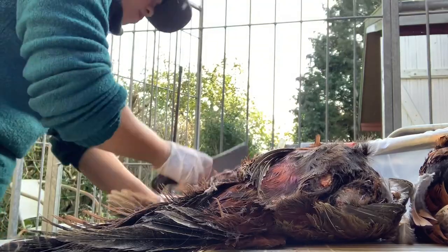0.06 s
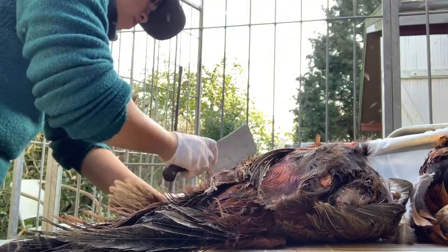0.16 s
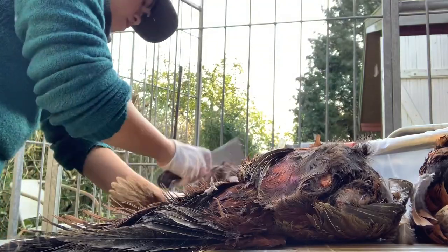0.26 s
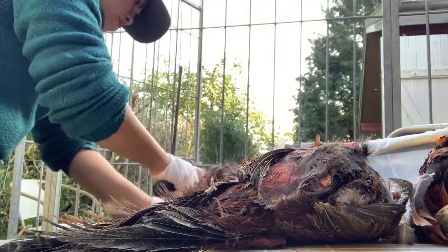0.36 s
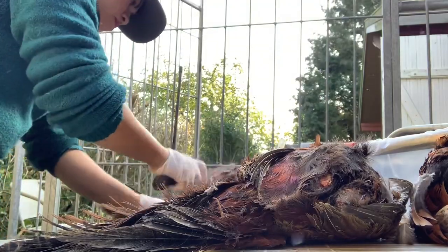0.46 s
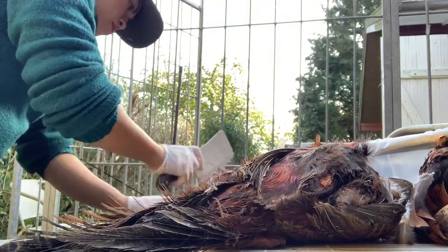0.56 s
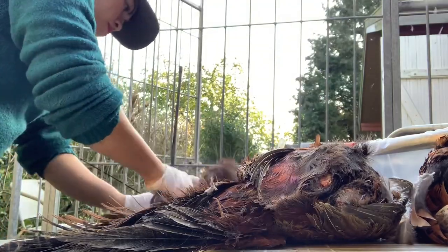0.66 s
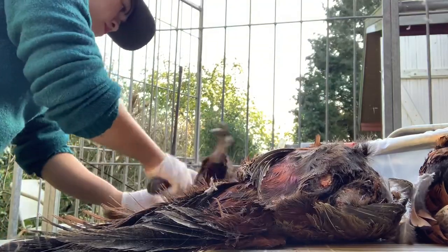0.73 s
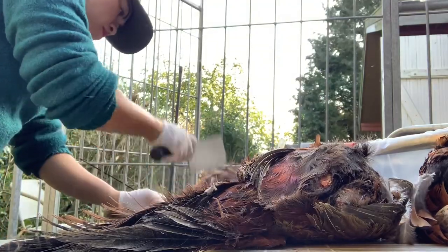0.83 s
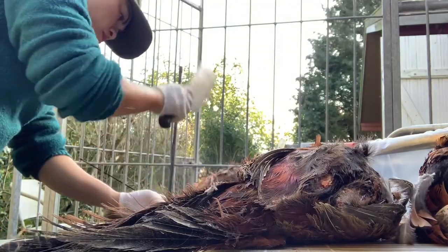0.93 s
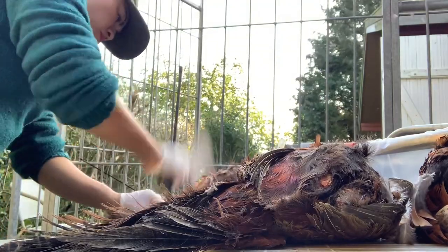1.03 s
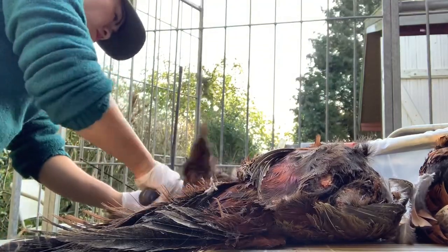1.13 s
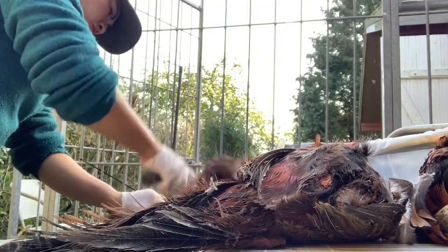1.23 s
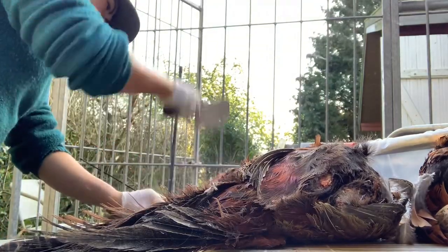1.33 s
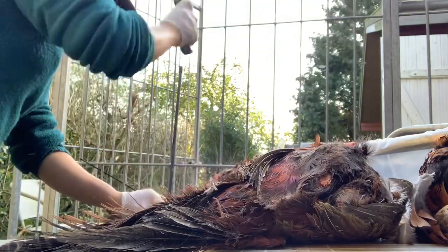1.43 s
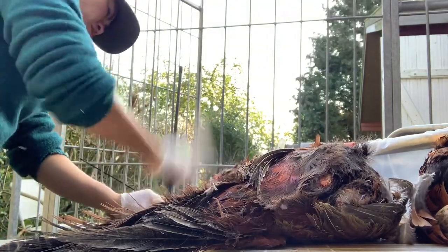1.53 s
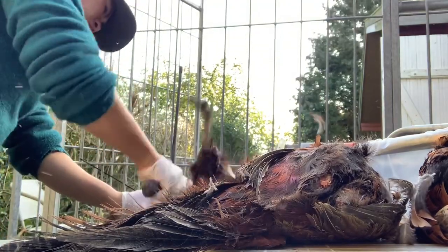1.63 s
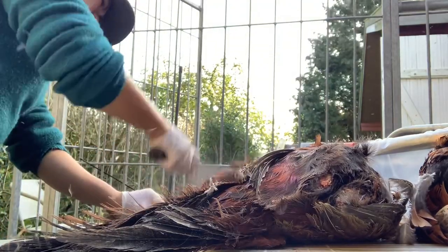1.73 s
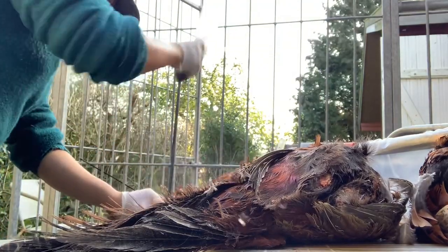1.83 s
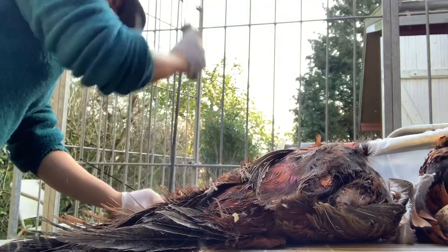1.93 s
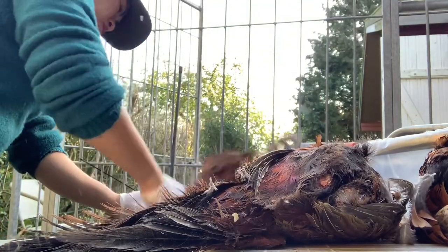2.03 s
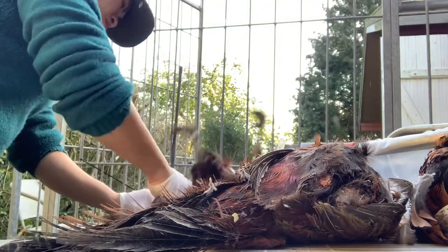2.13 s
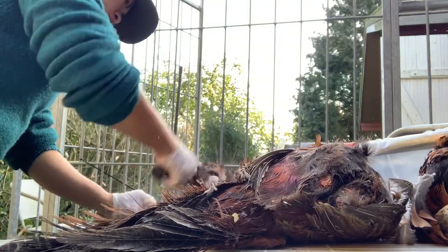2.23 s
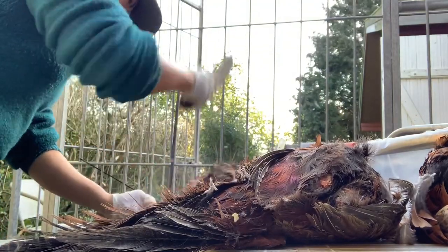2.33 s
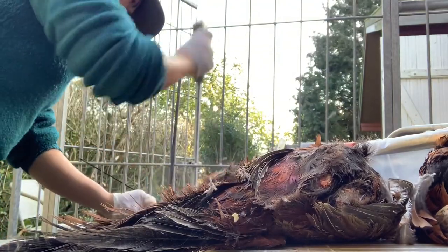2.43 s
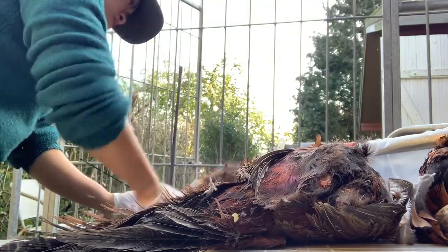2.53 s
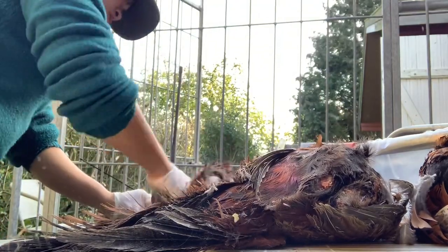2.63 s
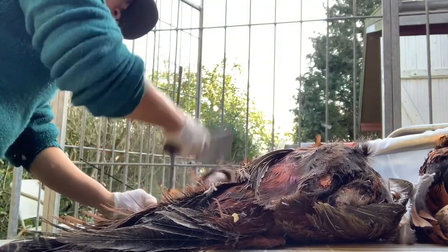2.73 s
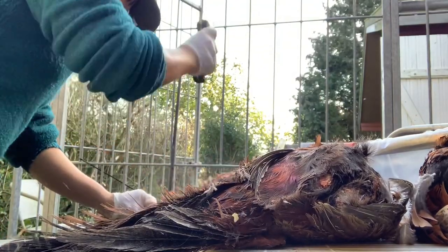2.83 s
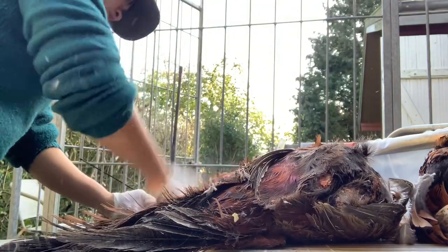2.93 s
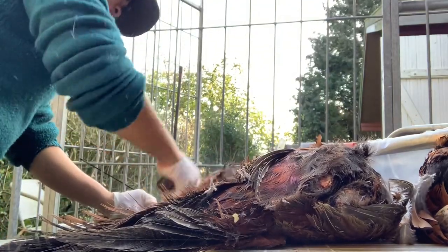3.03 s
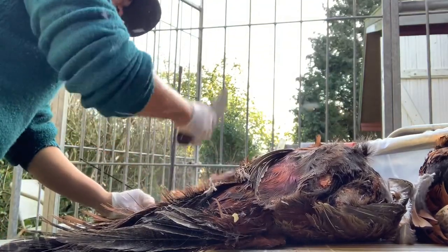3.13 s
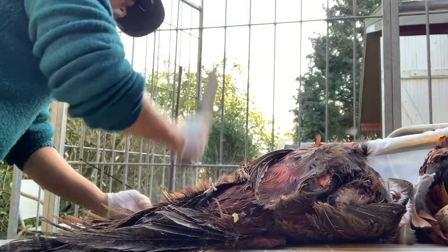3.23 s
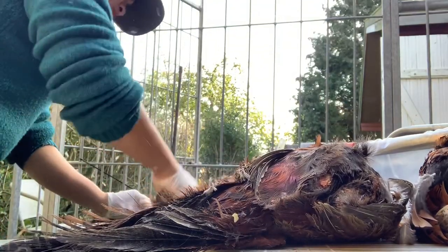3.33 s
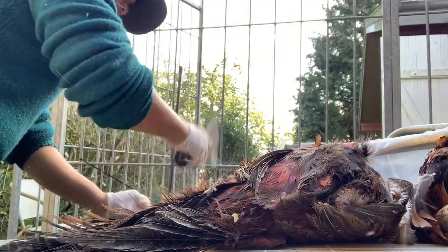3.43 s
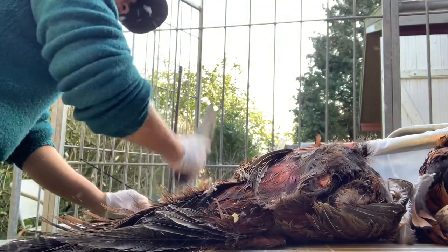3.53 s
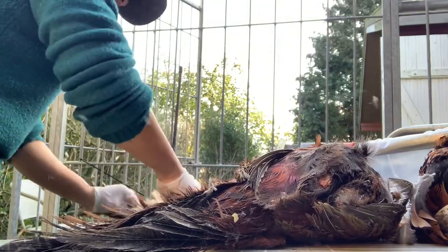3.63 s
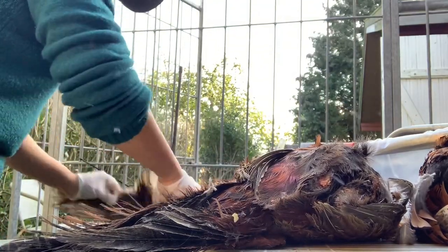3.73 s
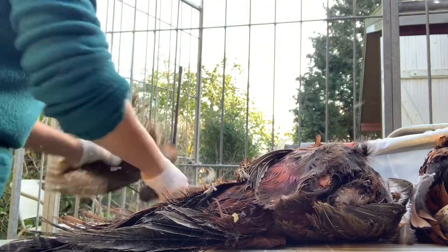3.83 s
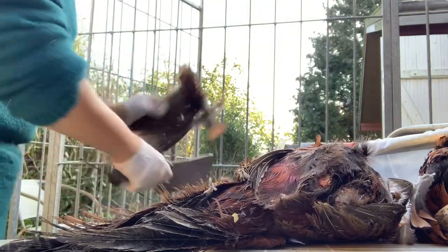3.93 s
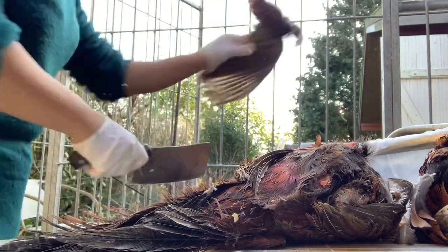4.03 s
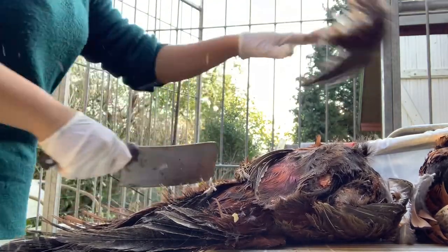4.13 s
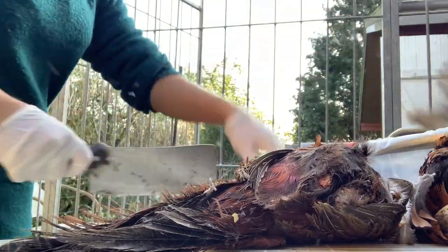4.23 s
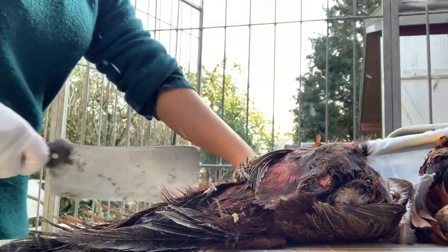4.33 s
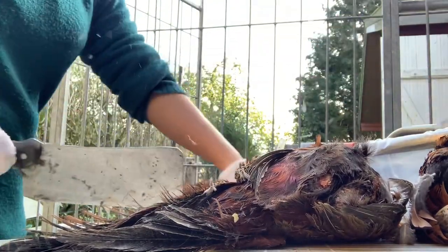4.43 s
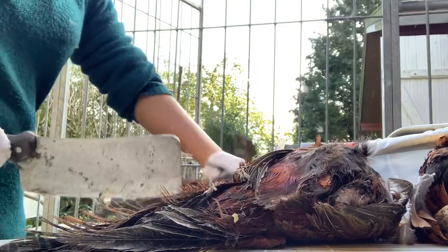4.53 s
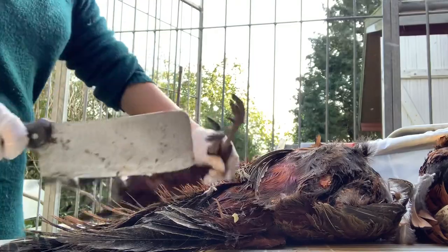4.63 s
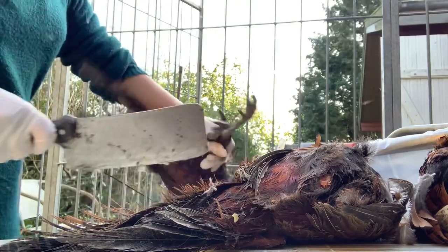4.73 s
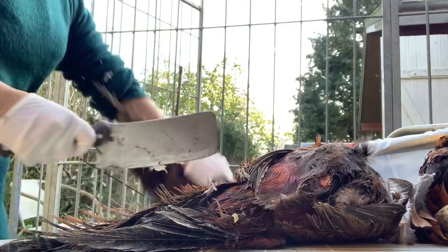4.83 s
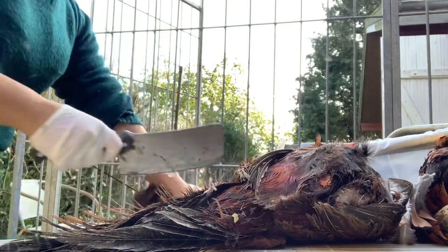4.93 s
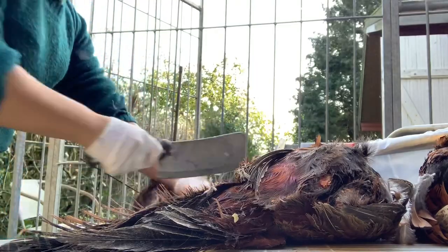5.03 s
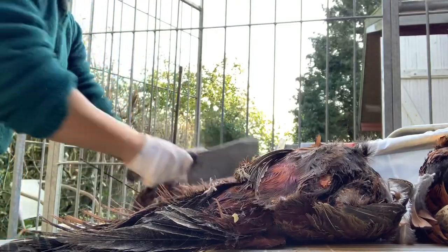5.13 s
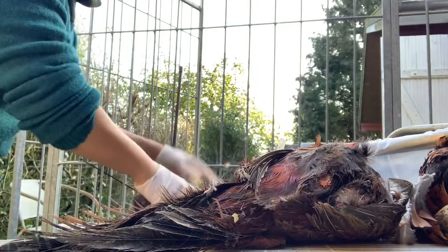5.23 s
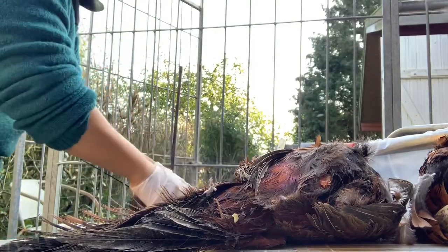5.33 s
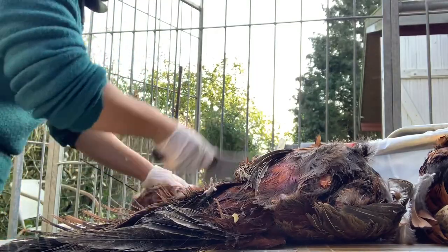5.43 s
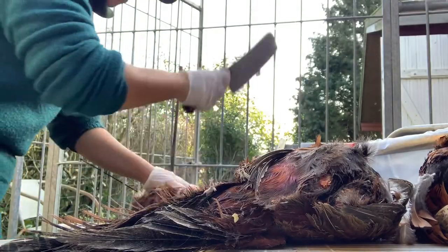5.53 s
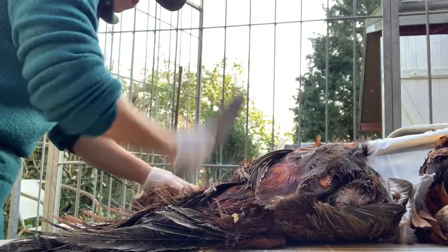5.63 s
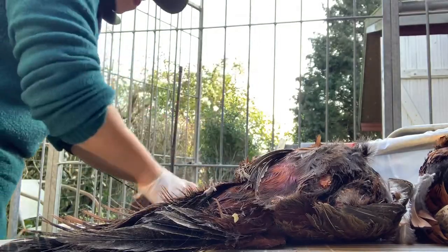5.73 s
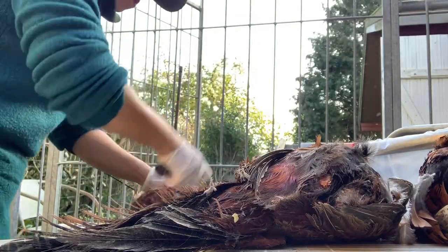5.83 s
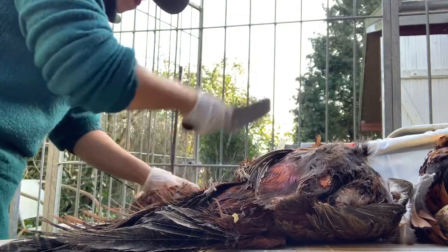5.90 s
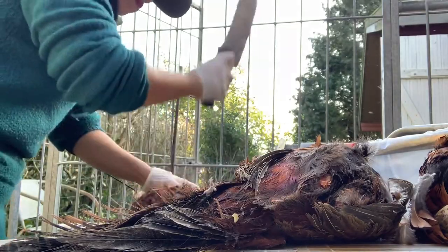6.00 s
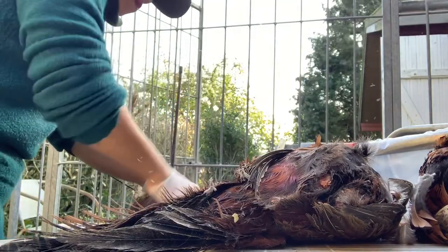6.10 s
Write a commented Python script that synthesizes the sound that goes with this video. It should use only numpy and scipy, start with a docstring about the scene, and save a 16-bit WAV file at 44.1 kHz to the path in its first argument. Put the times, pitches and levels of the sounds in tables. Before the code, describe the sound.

Close, dry stereo in a garden: light fumbling on a table, then about nine uneven chops, first dull and fleshy, later loud, crunchy and cracking, each thudding through the table top. A short squeak slips in among them. The blows stop while pieces are shifted and a tossed wing crackles past, then two crisp bone-breaking blows finish over quiet air and distant traffic rumble.

```python
"""First heard is a far traffic rumble under the murmur of air and leaves, with pieces rustling on a table.
A cleaver then chops feathered carcasses: random snaps of bone, flesh, quill and feather excite resonances.
Each blow also jolts the light table top, whose damped modes knock and then boom, as they do for bumps of
hands and pieces and for bounces just after some blows. A tossed wing brushes past as crackle; squeak, whine
and bird call are wavering tones. Two close microphone ports differ in phase and level."""
import sys
import numpy as np
from scipy import signal
from scipy.fft import rfft, irfft, next_fast_len
from scipy.io import wavfile

SR = 44100
rng = np.random.default_rng(int(sys.argv[2]) if len(sys.argv) > 2 else 0)


def put_to_file(sound):
    """Save the sound as 16-bit audio at rate SR, in the file named by the first command-line argument."""
    columns = np.atleast_2d(sound).T  # one column per channel
    safe = np.clip(columns, -1, 1)
    whole_steps = np.round(safe * 32767)
    wavfile.write(sys.argv[1], SR, whole_steps.astype(np.int16))


N = 271656

# Noise spectrum of far traffic: frequency_hz, density_db (relative, per Hz)
RUMBLE = [(22, -19), (50, 0.5), (100, -6), (200, -14), (330, -14.5)]
RUMBLE_DB = -50.5
# Noise spectrum of air and leaves: frequency_hz, density_db (relative, per Hz)
LEAVES = [(330, -2), (1000, -0.5), (1600, -8.5), (2500, -15), (5000, -23), (6500, -29), (8000, -48),
          (10000, -41.5), (13000, -37.5), (15500, -40)]
# Course of the air and leaves: start_s, level_db
MURMUR = [(0, -58.5), (.9, -53.5), (2.6, -59), (3.9, -57), (6.16, -58.5)]
# Left-right correlation of the background: frequency_hz, likeness (-1 to 1)
LIKENESS = [(60, 0.79), (150, 0.91), (380, 0.36), (950, -0.38), (2380, -0.11), (5980, 0.25), (15000, 0.1)]

# Tone curves: start_s, pitch_hz, level_db (before the common tone gain and flutter)
SQUEAK = [(3.27, 1615, -72), (3.35, 1625, -67), (3.43, 1612, -77)]   # short squeak
WHINE = [(5.3, 1141, -74.5), (6.16, 1132, -67.5)]   # faint far whine
WAVER = [(.6, 1110, -75), (.72, 1080, -65), (.9, 1093, -66.5)]   # faint wavering tone
CHIRP = [(1.35, 7060, -81), (1.44, 7500, -72), (1.47, 7700, -80)]   # thin bird call
# Partials of the squeak: multiple, level_db
SQUEAK_OVERTONES = [(1, 0), (2, -12), (3, -18)]

# A tossed wing brushes past: start_s, level_db, hiss_db (re level)
FEATHERS = [(4.17, -72, 0), (4.196, -50.5, -3.5), (4.3, -62.5, -13), (4.39, -63.5, -13), (4.45, -45, -9),
            (4.51, -64, -18), (4.596, -66, -4), (4.64, -71.5, -17), (4.79, -87, -16)]
# Resonances of feather hiss: frequency_hz, width_hz, level_db
FEATHER = [(7300, 3300, -4.5), (11770, 1870, 1.5), (13500, 2300, 0), (15700, 1370, 2)]
HISS_SLOPE = 1.64   # dB of hiss gained per dB of quill crackle in a contact

# Knock modes of the table top, before random spread: frequency_hz, level_db, t60_s
KNOCK_MODES = [(162.4, 0, 0.06), (205, 2.5, 0.058), (256, -4.5, 0.065), (332, -11.5, 0.039)]
# Boom modes of the whole top on its legs: multiple (of BOOM_HZ), level_db, t60_s
BOOM_MODES = [(1.0, 0, 0.041), (1.04, -6.5, 0.2), (.8, -10, 0.15), (1.38, 0, 0.071), (1.75, -2, 0.061)]
BOOM_HZ, BOOM_LAG_S = 92.7, 0.00672
# Bumps of hands and pieces, and bounces just after some blows: start_s, jolt_db
BUMPS = [(0.487, -29), (0.523, -34), (0.605, -39), (0.626, -35), (0.776, -44), (.855, -37.5), (1.031, -20),
         (1.193, -34), (1.297, -31.5), (1.689, -34), (1.842, -18), (1.991, -16.5), (2.91, -27.5),
         (3.807, -34.5), (4.445, -33.5), (5.145, -44)]
BUMP_BOOM_DB = -4.5   # boom re jolt

# Cleaver blows: start_s, level_db, cutting_ms, bone_ring_hz, flesh_db, splinter_db, quill_db,
# crack_ms (after the bite), jolt_db (into the table), boom_db (re jolt)
CHOPS = [(1.002, -39, 24, 1266, 6, -12, -22, 15, -21, -1),
         (1.498, -30.5, 18, 1405, 3.5, -6, -12, 10.8, -14.5, -2),
         (1.540, -34.5, 15, 1030, 2.5, -26.5, -19, 8, -20.5, -5.5),
         (1.962, -25, 14, 1594, 6, -9.5, -11, 8.1, -10, -4),
         (2.201, -32.5, 12, 1680, -5.5, -11, -10.5, 6.4, -38, 4),
         (2.476, -20, 17, 1534, -6, -14.5, -11.5, 12.4, -13, -3),
         (2.886, -18.5, 23, 1475, -4.5, -12, -18, 17.7, -13.5, -2),
         (3.241, -22.5, 13, 1420, -3.5, -14, -18.5, 7.5, -13.5, -2.5),
         (3.522, -20.5, 21, 1495, -6, -19, -24.5, 12.8, -20, 2.5),
         (5.626, -19.5, 17, 1756, -4.5, -11, -6.5, 14.3, -20.5, 0.5),
         (6.027, -22, 18.6, 1750, -5, -6, -8.5, 15, -22, 9)]
JOLT_SHARE = 0.748   # share of the cut after which the blow reaches the table
# Pieces dragged, gripped and dropped: start_s, level_db, contact_ms, bone_ring_hz, flesh_db, splinter_db
RUSTLES = [(0.015, -56.5, 22, 1440, 3.5, -9.5), (0.61, -55.5, 16, 1580, -1, -17),
           (0.70, -57, 9.8, 1510, -2, -14.5), (0.788, -63, 21, 3800, 2, -2.5),
           (1.04, -61, 20, 1420, 13, -1.5), (1.19, -60, 52, 1300, -4, -10.5),
           (2.005, -62.5, 31, 1410, -7, 4.5), (2.16, -53.5, 33, 1730, -14, -12.5),
           (3.803, -59.5, 38, 860, 18.5, -29), (3.85, -66.5, 74, 790, 15, -16.5),
           (4.192, -55, 12, 1380, 11, -6), (4.43, -51, 38, 1420, 6, -7),
           (4.962, -44.5, 37, 1540, -8, -19.5), (4.988, -47.5, 23, 2580, -5, -7),
           (5.135, -53.5, 21, 1440, 5.5, -5)]
RUSTLE_PEAK_SHARE = 0.65   # share of the contact at which its crack comes
# Bone resonances: multiple (of bone ring), width_hz, level_db
BONE = [(1.0, 237, 3.5), (.86, 220, 0), (.68, 224, 0), (1.2, 630, -9.5)]
# Soft tissue resonances: frequency_hz, width_hz, level_db
FLESH = [(304, 227, 2), (530, 423, 3.5), (787, 309, 1)]
# Splinter resonance: frequency_hz, width_hz, level_db
SPLINTER = [(2400, 2460, 0)]
# Quill resonance: frequency_hz, width_hz, level_db
QUILL = [(4990, 2850, 0)]
# Blade modes damped by the meat, before random spread: frequency_hz, width_hz, level_db
BLADE = [(2068, 130, 7.5), (2345, 200, 8.5), (3460, 270, -2.5), (4350, 96, -10), (4940, 240, -22),
         (5530, 140, -10)]
BLADE_SPREAD_DB = 4   # each contact drives the modes unevenly
# Broad resonance of the break itself: frequency_hz, width_hz, level_db
CRACK = [(1099, 990, 0)]
CRACK_GAP_MS, CRACK_MS = 2.0, 1.44   # mean spacing of the three clicks; time scale of the burst of snaps

# Port phase for table sounds: frequency_hz, left_lead_rad
PORT_PHASE = [(60, -.35), (300, -.6), (600, -1.8), (1150, -1.1), (1450, 1.0), (2300, 1.1), (3000, -.9),
              (4800, -.9), (6000, -5.0), (7300, -8.9), (10000, -8.9), (12000, -6.8), (15300, -6.7)]
# Port level difference: frequency_hz, left_minus_right_db
PORT_BALANCE = [(60, 2), (150, -2), (380, 4), (950, -1), (2380, -0.5), (5980, 5), (15000, -3.5)]
# Reflections from table edge and fence: delay_s (mean of the two ports), level_db (before treble loss)
ECHOES = [(.004, -16), (.021, -18.5)]
CUTOFF_HZ = 15850   # stopband edge


def from_db(db):
    """Logarithmic level: decibels become an amplitude ratio."""
    return 10 ** (np.asarray(db) / 20)


def rms_one(x):
    """Normalisation: scale to unit root-mean-square amplitude."""
    return x / np.sqrt(np.mean(x ** 2) + 1e-20)


def in_time(rows):
    """Linear interpolation: curve columns at every sample, plus a soft-ended mask of the curve's span."""
    s, *columns = np.transpose(rows)
    t = np.arange(N) / SR
    inside = np.clip(np.minimum(t - s[0], s[-1] - t) / 0.016, 0, 1)
    return [np.interp(t, s, c) for c in columns] + [inside]


def at_hz(points, hz):
    """Logarithmic pitch: interpolate a table along a log-frequency axis."""
    points = np.array(points)
    return np.interp(np.log(hz + 1), np.log(points[:, 0] + 1), points[:, 1])


def drift(rate_hz):
    """Low-passed noise: a slow random wander of spread 1."""
    step = 40   # samples per slow value
    r = np.exp(-2 * np.pi * rate_hz * step / SR)
    white = rng.standard_normal(N // step + 2002)
    slow = signal.lfilter([1], [1, -2 * r, r * r], white)[2000:]   # the filter's start-up is dropped
    return np.interp(np.arange(N) / step, np.arange(len(slow)), rms_one(slow))


def resonate(x, peaks, unit_hz=1):
    """Parallel damped resonators of alternating sign; unit rms in all."""
    out = 0
    for k, (hz, width_hz, db) in enumerate(peaks):
        r = np.exp(-np.pi * width_hz / SR)
        angle = 2 * np.pi * hz * unit_hz / SR
        ring = signal.lfilter([1 - r * r, 0, r * r - 1], [1, -2 * r * np.cos(angle), r * r], x)
        out = out + (-1) ** k * from_db(db) * ring
    return rms_one(out)


def snaps(size, per_s, spread_db):
    """Random impulse train: fibres and splinters break as clicks of uneven size and either sign."""
    chance, sign, strength = rng.random((3, size))
    breaks = chance < per_s / SR
    force = from_db(-spread_db * np.log(1 - .98 * strength))
    return breaks * np.sign(sign - .5) * force + 1e-18


def banded_noise(spectrum, low_hz, count, patchy_db):
    """Filtered stereo noise: third-octave bands with own level, flicker and correlation; unit rms."""
    out, together = 0, drift(2.5)
    edges = low_hz * 2 ** (np.arange(count + 1) / 3)
    white = rng.standard_normal((2, 2, N))
    for k, (low, high) in enumerate(zip(edges, edges[1:])):
        band = signal.butter(2, [low, high], "band", fs=SR, output="sos")
        mid, side = signal.sosfilt(band, white[k % 2])   # neighbouring bands use different noise
        hz = np.sqrt(low * high)
        alike = np.clip(at_hz(LIKENESS, hz), -1, 1)
        gain = from_db(at_hz(spectrum, hz) + patchy_db * (1.04 * together + drift(10.7)))
        stereo = np.sqrt(1 + alike) * mid + np.sqrt(1 - alike) * side * [[1], [-1]]
        out = out + gain * stereo
    return rms_one(out)


def traffic_rumble():
    """Low-frequency noise radiation: far traffic as unsteady bass bands."""
    return from_db(RUMBLE_DB) * banded_noise(RUMBLE, 19.93, count=12, patchy_db=2.0)


def leaf_murmur():
    """Broadband turbulence noise: air and leaves, swelling along a level curve."""
    level_db, _ = in_time(MURMUR)
    return from_db(level_db) * banded_noise(LEAVES, 323.6, count=17, patchy_db=1.84)


def tone(curve, overtones, waver, flutter_db):
    """Frequency and amplitude modulation: a wavering whistle with harmonic partials."""
    hz, db, inside = in_time(curve)
    phase = 2 * np.pi * np.cumsum(hz * (1 + waver * drift(29.5))) / SR
    gain = inside * from_db(db + 6.0 + flutter_db * drift(30))
    return gain * sum(from_db(partial_db) * np.sin(k * phase) for k, partial_db in overtones)


def whistles():
    """Quasi-periodic tones: squeak with partials; bird call, whine and wavering tone as single sines."""
    pure = [(1, 0)]
    squeak = tone(SQUEAK, SQUEAK_OVERTONES, waver=.014, flutter_db=4)
    chirp = tone(CHIRP, pure, waver=.03, flutter_db=4.5)
    return squeak + chirp + sum(tone(curve, pure, waver=0.0078, flutter_db=5.0) for curve in (WHINE, WAVER))


def feathers():
    """Frictional impulses: rubbing barbs give a dense, uneven bright crackle."""
    db, hiss_db, inside = in_time(FEATHERS)
    breaks = snaps(N, per_s=5600.0, spread_db=1.0) * from_db(1.8 * drift(38))
    rub = resonate(breaks, [(2500, 2900, 0.37), (6340, 2850, 0.3)])
    hiss = from_db(hiss_db) * resonate(resonate(breaks, FEATHER), FEATHER)
    return inside * from_db(db) * (rub + hiss)


def table_top(jolts):
    """Modal decay: each jolt rings the knock modes at once; the boom of the whole top builds a little later."""
    out, t = np.zeros(N + SR), np.arange(SR // 2) / SR
    chance = rng.standard_normal((len(jolts), 2, len(KNOCK_MODES)))
    late = np.maximum(t - BOOM_LAG_S, 0)
    boom = sum(from_db(mode_db - 60 * late / t60) * np.sin(2 * np.pi * k * BOOM_HZ * late)
               for k, mode_db, t60 in BOOM_MODES)
    boom = boom * (1 - np.exp(-late / 0.0047))
    for (s, db, boom_db), (strength, place) in zip(jolts, chance):
        # strength and place vary the level and pitch of each mode
        knock = sum(from_db(mode_db + 2.0 * a - 60 * t / t60) * np.sin(2 * np.pi * hz * (1 + 0.062 * b) * t)
                    for (hz, mode_db, t60), a, b in zip(KNOCK_MODES, strength, place))
        knock = knock * (1 - np.exp(-t / 0.0026)) ** 2
        at = round(s * SR)
        out[at:at + len(t)] += from_db(db) * (knock + from_db(boom_db) * boom)
    return out[:N]


def contact_force(ms, hold_ms, crack_ms, swell_db, lead_in_db, rise_db_ms, bite_db_ms, fall_db_ms,
                  linger_db, linger_db_ms, sag_db_ms, crack_db):
    """Amplitude envelope: short rising crunch before the peak, sag and fast stop; also the settling tail."""
    before, after = np.maximum(-ms, 0), np.maximum(ms - hold_ms, 0)
    growth_db = swell_db * (np.clip(ms / crack_ms, 0, 1) - 1)
    edges_db = -bite_db_ms * before - fall_db_ms * after
    sag_db = -sag_db_ms * np.maximum(ms - crack_ms, 0)
    burst_db = crack_db * np.exp(-((ms - crack_ms) / CRACK_MS) ** 2)
    cut = from_db(growth_db + edges_db + sag_db + burst_db)
    cut = cut + (ms < 0) * from_db(lead_in_db - swell_db - rise_db_ms * before)
    settle = (ms >= 0) * from_db(linger_db - linger_db_ms * after)
    return cut, settle


def crack_clicks(size, lead, crack_ms):
    """Brittle fracture: three hard clicks, uneven in time and force, through one broad resonance."""
    clicks, (when, force) = np.full(size, 1e-18), rng.random((2, 3))
    click_ms = crack_ms + CRACK_GAP_MS * (np.arange(-1, 2) + when - .5)
    clicks[lead + (click_ms * SR / 1000).astype(int)] = .5 + force
    return resonate(clicks, CRACK)


def crunches(table, per_s, hiss_db, blade_db, click_db, **force_settings):
    """Fracture-driven resonance: snaps under the contact force ring bone, flesh, splinter, quill and steel."""
    out, lead, size = np.zeros(N + SR), SR // 16, SR // 4
    ms = (np.arange(size) - lead) * 1000 / SR
    for s, db, hold_ms, ring_hz, flesh_db, splinter_db, quill_db, crack_ms, *_ in table:
        cut, settle = contact_force(ms, hold_ms, crack_ms, **force_settings)
        breaks = snaps(size, per_s, spread_db=4.0)
        bone_breaks = (cut + 0.47 * settle) * breaks   # bone rings mostly under the blade
        flesh_breaks = (cut + settle) * breaks
        # splinters and quills break on their own and go on longer
        splinters = (cut + 2.07 * settle) * snaps(size, per_s, spread_db=0.5)
        quills = (cut + 2.46 * settle) * snaps(size, 2 * per_s, spread_db=4.0)
        blade_modes = [(hz, width_hz, mode_db + BLADE_SPREAD_DB * a)
                       for (hz, width_hz, mode_db), a in zip(BLADE, rng.standard_normal(len(BLADE)))]

        bone = resonate(resonate(bone_breaks, BONE, ring_hz), [(0.96, 0.83 * ring_hz, 0)], ring_hz)
        flesh = resonate(resonate(flesh_breaks, FLESH), [(517, 1400, 0)])   # soft tissue has little treble
        splinter = resonate(resonate(splinters, SPLINTER), SPLINTER)
        quill = resonate(resonate(quills, QUILL), QUILL)
        blade = resonate(splinters, blade_modes)
        hiss = resonate(resonate(quills, FEATHER), FEATHER)

        sound = bone + from_db(flesh_db) * flesh + from_db(splinter_db) * splinter
        sound = sound + from_db(quill_db) * quill + from_db(splinter_db + blade_db) * blade
        sound = sound + from_db(hiss_db + HISS_SLOPE * quill_db) * hiss
        sound = sound + from_db(click_db) * crack_clicks(size, lead, crack_ms)
        at = round(s * SR)
        out[at:at + size] += from_db(db) * np.sqrt(np.mean(cut ** 2)) * sound
    return out[lead:lead + N]


def rustles():
    """Sliding and gripping contact: a gentle swell with a small crack part-way through."""
    # splinter level serves for the quills too
    rows = [(*row, row[-1], RUSTLE_PEAK_SHARE * row[2]) for row in RUSTLES]
    return crunches(rows, per_s=5000.0, hiss_db=-9.5, blade_db=1, click_db=-18,
                    swell_db=1.5, lead_in_db=-15, rise_db_ms=0.1, bite_db_ms=1.0, fall_db_ms=0.7,
                    linger_db=-14, linger_db_ms=.18, sag_db_ms=0.43, crack_db=2.0)


def chops():
    """Forced fracture: the crunch under the cleaver grows until the bone cracks, then sags and stops."""
    return crunches(CHOPS, per_s=3500.0, hiss_db=1.5, blade_db=-1.5, click_db=-8,
                    swell_db=7, lead_in_db=-9, rise_db_ms=0.53, bite_db_ms=1.5, fall_db_ms=2.0,
                    linger_db=-12, linger_db_ms=0.38, sag_db_ms=0.68, crack_db=1.5)


def at_ports(x):
    """Two-path propagation: the ports differ in phase and level by frequency; dull echoes reach the left later."""
    size = next_fast_len(N + SR // 4)
    hz = np.arange(size // 2 + 1) * SR / size
    side = np.array([[1], [-1]])   # left, right
    echoes = sum(from_db(db) * np.exp(-2j * np.pi * hz * s * (1 + .15 * side)) for s, db in ECHOES)
    echoes = echoes / (1 + (hz / 6000) ** 2)
    balance = from_db(side * at_hz(PORT_BALANCE, hz) / 2)
    ports = balance * np.exp(.5j * side * at_hz(PORT_PHASE, hz))
    return irfft(rfft(x, size) * ports * (1 + echoes), size)[:, :N]


def scene():
    """Superposition: table sounds and whistles through the ports, over the garden background."""
    garden = traffic_rumble() + leaf_murmur()
    blows = [(s + JOLT_SHARE * cut_ms / 1000, jolt_db, boom_db)
             for s, _, cut_ms, *_, jolt_db, boom_db in CHOPS]
    table = table_top(blows + [(s, db, BUMP_BOOM_DB) for s, db in BUMPS])
    return at_ports(whistles() + feathers() + table + rustles() + chops()) + garden


def record(dry):
    """Band limiting: the microphone drops the deepest bass and the top is cut."""
    dry = signal.sosfilt(signal.butter(2, 46, "high", fs=SR, output="sos"), dry)
    return signal.sosfilt(signal.cheby2(12, 70, CUTOFF_HZ, fs=SR, output="sos"), dry)


dry = scene()
out = record(dry)
put_to_file(out)
```